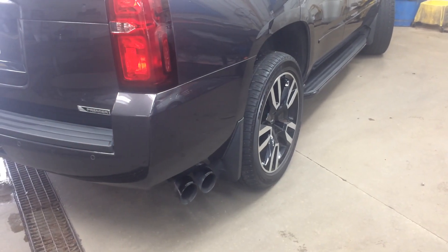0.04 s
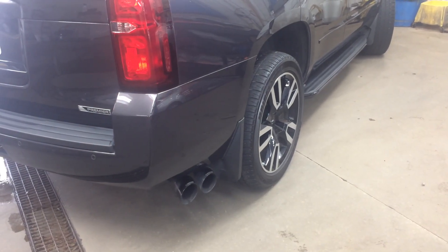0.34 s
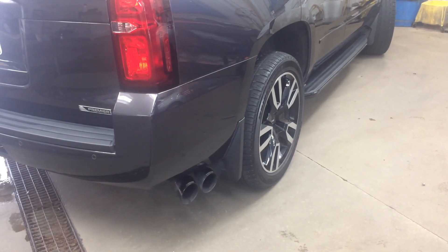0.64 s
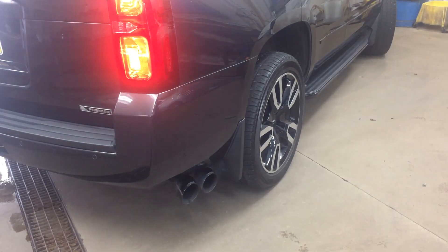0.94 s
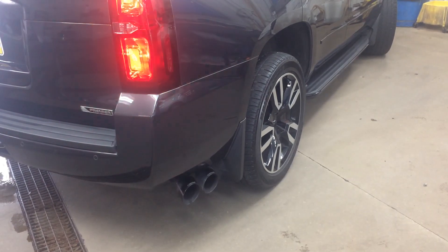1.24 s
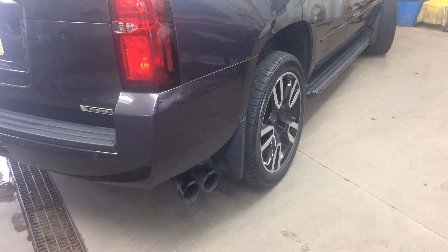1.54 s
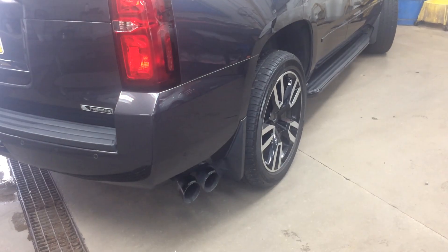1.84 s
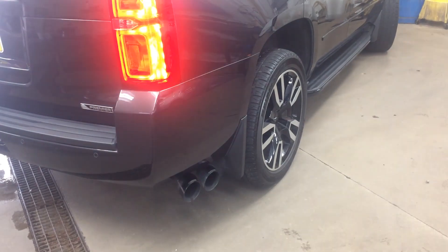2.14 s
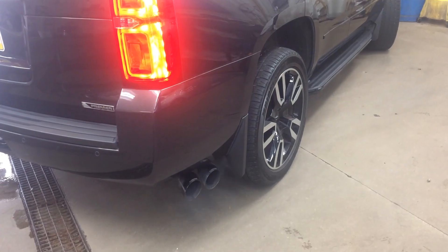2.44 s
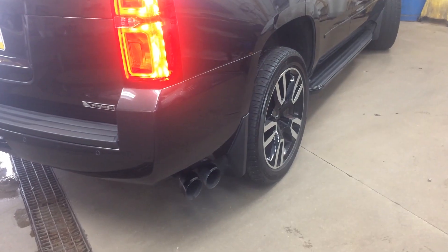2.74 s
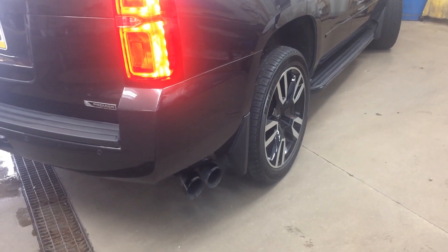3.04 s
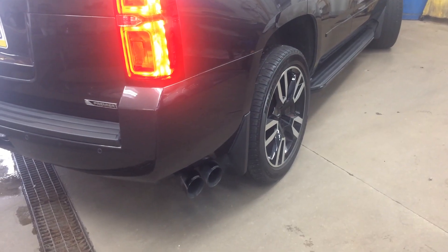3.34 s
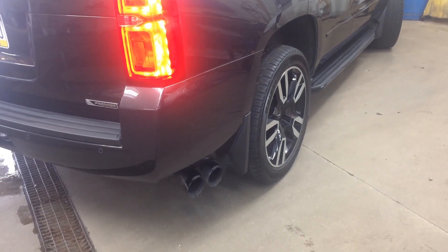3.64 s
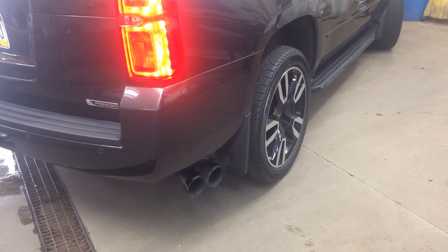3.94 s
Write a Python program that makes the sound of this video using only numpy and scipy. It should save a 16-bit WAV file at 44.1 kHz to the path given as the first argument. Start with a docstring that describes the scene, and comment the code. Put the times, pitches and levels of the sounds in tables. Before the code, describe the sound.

A big V8 engine starts in a garage, heard close to the tailpipes. A low room hum throbs at first, joined by a faint, thin fuel pump whine at 0.8 seconds. At about 1.2 seconds the starter knocks in and grinds. The engine catches at 2 seconds with hard bangs, then runs in a loud, fast, burbling idle that sinks slightly until 4 seconds.

```python
"""A big V8 starts from cold in a garage, heard from beside its tailpipes. A room hum throbs, and the fuel
pump sets in with a thin whine. The starter pinion knocks in and its gears grind through a few
compressions, ringing their housing. The engine catches with hard bangs and the starter dies away.
Unevenly spaced exhaust pulses then excite the pipes in a fast, burbling idle that slowly sinks."""
import sys
import numpy as np
from scipy import signal
from scipy.fft import rfft, irfft, next_fast_len
from scipy.io import wavfile
from scipy.ndimage import map_coordinates

SR = 44100
rng = np.random.default_rng(int(sys.argv[2]) if len(sys.argv) > 2 else 0)


def to_wav(s):
    """Save 16-bit WAV."""
    ch = np.atleast_2d(s).T  # columns
    pcm = np.round(np.clip(ch, -1, 1) * 32767)  # PCM
    wavfile.write(sys.argv[1], SR, pcm.astype(np.int16))


N = 176400
CATCH_S = 1.98

# engine speed: time_s, firing_rate_hz
FIRING_RATE = [(1.98, 99.71), (2.1, 100.41), (2.2, 96.84), (2.35, 99.48), (2.5, 98.73), (2.65, 98.3),
               (2.8, 96.34), (3.0, 95.49), (3.2, 95.3), (3.4, 95.07), (3.6, 93.51), (3.8, 92.06),
               (4.0, 89.5)]
# cylinders in firing order: delay_in_firing_gaps, thump_db, bark_db, rasp_db, ring_db, tick_db
FIRING_ORDER = [(.48, -1, -2, -2, -7, -26), (.3, 2, 1, 6, 2.5, -1.5), (.38, -8, -9, 2, -1, -29),
                (.2, 4, -14, -14, -10, -7), (.35, 0, 6.5, 1, 7, 6), (.44, 1, 5, 4, 2.5, -23),
                (.28, 0, 1, -2, 2.5, -1.5), (.42, 3, 1, 1, 5.5, 4.5)]
# envelopes of the deep rumble and of the pipe boom: time_s, level_db
RUMBLE_ENVELOPE = [(1.98, -21), (2.02, -27), (2.11, -28), (2.2, -25), (2.8, -26), (3.12, -33), (3.4, -30),
                   (4, -42)]
BOOM_ENVELOPE = [(1.98, -64), (2.01, -22), (2.05, -13.5), (2.2, -18.5), (2.45, -18), (2.75, -17.5),
                 (2.9, -19), (3.45, -18.5), (3.8, -17), (4, -14.5)]
# envelopes of the upper exhaust bands: time_s, bark_db, rasp_db, hiss_db
UPPER_ENVELOPES = [(1.98, -19, -31, -25), (2.02, -14, -14, -26.5), (2.08, -22.5, -20.5, -32.5),
                   (2.25, -18, -22.5, -35.5), (2.6, -21.5, -25.5, -41.5), (2.9, -21.5, -26, -42.5),
                   (3.5, -22, -27, -40.5), (4, -23.5, -28.5, -41.5)]


def amp(db):
    """Decibels to amplitude ratio."""
    return 10 ** (np.asarray(db) / 20)


def unit(x):
    """Normalisation to rms 1."""
    return x / np.sqrt(np.mean(x ** 2) + 1e-20)


def clock():
    """Sample times in seconds."""
    return np.arange(N) / SR


def along(points, hz):
    """Interpolation on a logarithmic frequency axis."""
    f, v = np.transpose(points)
    return np.interp(np.log(hz + 1), np.log(f + 1), v)


def curves(rows):
    """Linear interpolation in time: one curve for each column after the first."""
    times, *columns = np.transpose(rows)
    return [np.interp(clock(), times, column) for column in columns]


def wobble(rate):
    """Smooth random modulation: a spline through `rate` knots a second."""
    return map_coordinates(rng.standard_normal(int(N * rate / SR) + 4), [clock() * rate])


def coloured(x, spectrum):
    """Minimum-phase filtering by the folded cepstrum, at rms 1."""
    m = 2 * next_fast_len(N)
    cepstrum = irfft(np.log(amp(along(spectrum, np.fft.rfftfreq(m, 1 / SR)))))
    cepstrum[1:m // 2] *= 2
    cepstrum[m // 2 + 1:] = 0
    return unit(irfft(rfft(x, m) * np.exp(rfft(cepstrum)))[:N])


def noise(spectrum):
    """Spectrally shaped noise of rms 1."""
    return coloured(rng.standard_normal(N), spectrum)


def resonance(hz, width):
    """A resonance driven by noise gives a fuzzy tone."""
    f = np.fft.rfftfreq(N, 1 / SR)
    return unit(irfft(rfft(rng.standard_normal(N)) / (1 + (2 * (f - hz) / width) ** 2), N))


def levelled(puff, spectrum):
    """Energy normalisation: puffs come out equally strong after the given filter."""
    response = amp(along(spectrum, np.fft.rfftfreq(len(puff), 1 / SR)))
    return puff / np.linalg.norm(rfft(puff) * response)


def bursts(events, spectrum, decay_s, edge):
    """Impulsive excitation: a pressure edge and decaying noise for each (start_s, level_db)."""
    t, out = np.arange(SR // 10) / SR, np.zeros(N)
    for start_s, db in events:
        puff = np.exp(-t / decay_s) * rng.standard_normal(len(t))
        puff[0] -= edge * np.linalg.norm(puff)
        out[int(start_s * SR):][:len(t)] += amp(db) * levelled(puff, spectrum)
    energy = sum(amp(db) ** 2 for _, db in events) * decay_s / 2
    return coloured(out, spectrum) * np.sqrt(energy * SR / N)


def room_tone(floor_db=-44.5, rustle_db=-46, fade_s=0.29):
    """Low room modes drone over broadband noise, while a rustle of air decays exponentially."""
    # ambient noise and rustle: frequency_hz, density_db
    floor_spectrum = [(15, -48), (25, -46), (48, -10.5), (63, -28), (87, -24), (144, -12), (202, -27),
                      (244, -36.5), (436, -30.5), (525, -32.5), (741, -30), (1360, -32.5), (2500, -35),
                      (3400, -39), (4900, -42.5), (5900, -49), (14000, -68)]
    rustle_spectrum = [(60, -3), (150, 8.5), (230, 2), (310, 11), (420, 5.5), (700, 6), (2500, -0.5),
                       (5000, -7), (9000, -14), (15000, -31)]
    # room modes: frequency_hz, width_hz, level_db
    modes = [(202.2, 25, -45.5), (287, 150, -55.5)]
    # their envelope: time_s, gain_db
    mode_envelope = [(0, 6), (.16, 2.5), (.24, 6.5), (.31, 1), (1.2, -0.5)]
    drone = sum(amp(db) * resonance(hz, width) for hz, width, db in modes)
    rustle = noise(rustle_spectrum) * amp(rustle_db) * np.exp(-clock() / fade_s)
    return amp(floor_db) * noise(floor_spectrum) + drone * amp(curves(mode_envelope)[0]) + rustle


def room_hum(pitch_hz=83.3, throb_s=0.027, floor_db=-43.5):
    """Amplitude modulation by Gaussian swells makes a low tone throb."""
    # swells of the hum: centre_s, level_db
    throbs = [(.02, -32), (.118, -31.5), (.206, -31), (.286, -33), (.385, -35), (.527, -29), (.62, -29),
              (.71, -31.5), (.8, -30.5), (.912, -33), (1.005, -31), (1.09, -26), (1.17, -30), (1.3, -31),
              (1.41, -35), (1.51, -34.5), (1.76, -47), (1.92, -36)]
    t = clock()
    envelope = amp(floor_db) + sum(amp(db) * np.exp(-((t - s) / throb_s) ** 2) for s, db in throbs)
    return envelope * unit(np.sin(2 * np.pi * pitch_hz * t + .5 * wobble(14.2)))


def fuel_pump(start_s=.78, rise_s=0.052):
    """Narrow bands of noise are heard as the thin whine of the pump."""
    # pump whine: frequency_hz, width_hz, level_db
    bands = [(4700, 700, -64), (7300, 600, -77), (12000, 1500, -82)]
    whine = sum(amp(db) * resonance(hz, width) for hz, width, db in bands)
    return whine * np.clip((clock() - start_s) / rise_s, 0, 1)


def garage(x, wet_db):
    """Reverberation between concrete walls: convolution with a tail whose treble dies first."""
    # reverberation time: frequency_hz, t60_s
    decay_times = [(100, 0.95), (1000, 0.75), (4000, 0.65), (12000, 0.13)]
    hz, t, bands = signal.stft(rng.standard_normal(SR // 2), SR, nperseg=256)
    tail = signal.istft(bands * amp(-60 * t / along(decay_times, hz)[:, None]), SR, nperseg=256)[1]
    response = np.r_[np.zeros(SR // 200), tail / np.linalg.norm(tail)]  # arrives 5 ms late
    wet = signal.fftconvolve(x, response)[:N]
    return (x + amp(wet_db) * wet) / np.hypot(1, amp(wet_db))


def pinion_knocks():
    """Brief impacts of the starter pinion radiate broadband clacks."""
    # impacts: start_s, level_db
    knocks = [(1.246, -16.5), (1.266, -15.5), (1.277, -12.5), (1.303, -19.5), (1.673, -21), (1.698, -21),
              (1.806, -31), (1.824, -24), (1.915, -19.5), (1.947, -21.5)]
    # one clack: frequency_hz, density_db
    knock_spectrum = [(70, -32), (130, -9), (270, -3), (600, -14.5), (1000, -8), (1450, 2), (2400, -6.5),
                      (4000, -11), (6000, -11.5), (10000, -15), (15500, -35)]
    return bursts(knocks, knock_spectrum, decay_s=0.008, edge=0.1)


def starter(compression_s=1.62, release_s=2.09, release_db_per_s=108):
    """Meshing gears, loaded by each compression, force their housing to ring; they fade after the catch."""
    # cranking envelopes: time_s, gear_db, tooth_db
    cranking = [(1.225, -66, -67), (1.247, -29.5, -22.5), (1.28, -25, -26), (1.34, -33.5, -31.5),
                (1.46, -27.5, -30), (1.52, -25, -30), (1.58, -28.5, -32), (1.664, -33, -31.5),
                (1.675, -28.5, -28.5), (1.73, -24.5, -30), (1.797, -35, -35.5), (1.81, -21.5, -26),
                (1.855, -25, -30.5), (1.905, -33, -34.5), (1.92, -31, -28), (1.95, -24.5, -29.5),
                (2, -37, -31.5)]
    # gear note: time_s, pitch_hz
    gear_pitch = [(1.25, 800), (1.35, 1020), (1.5, 1180), (1.63, 1300), (1.72, 1130), (1.78, 1330),
                  (1.84, 1200), (1.9, 1350), (2, 1400)]
    # gear grind and tooth rasp: frequency_hz, density_db
    gear_spectrum = [(71, -51), (120, -4.5), (140, -14), (178, -37), (199, -16), (285, -9.5), (422, -14.5),
                     (479, -6), (565, -9.5), (626, -6.5), (777, -8.5), (1270, -1.5), (2500, -12),
                     (3250, -42), (5500, -120)]
    tooth_spectrum = [(1470, -22), (2500, -12), (2820, 3.5), (3220, -8), (3690, 1.5), (4010, -5.5),
                      (4750, -2.5), (5360, -1), (6950, -4), (9950, -8.5), (15500, -26)]
    # housing modes: frequency_hz, width_hz, early_db, compressed_db
    modes = [(2290, 35, -11, -23), (2880, 50, -15, -20), (3330, 82, -14, -30), (3747, 210, -26, -10.5),
             (4920, 60, -20, -12.5)]
    # brief squeals: centre_s, half_length_s, pitch_hz, width_hz, level_db
    squeals = [(1.485, .025, 6870, 120, -38), (1.6, .045, 4720, 400, -32.5), (1.515, .04, 545, 45, -35),
               (1.45, .04, 1060, 60, -35), (1.703, .01, 1290, 110, -23), (1.829, .012, 1370, 120, -25)]
    t = clock()
    gear_db, tooth_db = curves(cranking)
    engaged = (t > cranking[0][0]) * amp(-release_db_per_s * np.maximum(t - release_s, 0))
    flutter = unit(amp(0.92 * wobble(300)))
    gear_phase = 2 * np.pi * np.cumsum(curves(gear_pitch)[0]) / SR
    gear_note = unit(np.sin(gear_phase + 1.75 * wobble(220)))
    ring = sum(amp(np.where(t < compression_s, early, compressed)) * resonance(hz, width)
               for hz, width, early, compressed in modes)
    gears = unit(noise(gear_spectrum) + amp(-5) * gear_note) * amp(gear_db - 1)
    teeth = unit(noise(tooth_spectrum) + ring) * amp(tooth_db - 1)
    squeal = sum(amp(db) * resonance(hz, width) * np.exp(-((t - s) / half) ** 2)
                 for s, half, hz, width, db in squeals)
    return engaged * flutter * (gears + teeth) + squeal


def firing_count():
    """Phase is the integral of frequency: firings counted from the catch."""
    count = np.cumsum(curves(FIRING_RATE)[0]) / SR
    return count - np.interp(CATCH_S, clock(), count)


def puffs(spectrum, delays, sizes_db, decay_s, rough, edge, scatter_db, jitter_s):
    """A pulse train: each firing is a pressure edge, its cylinder's own ripple and fresh turbulence."""
    count, out = firing_count(), np.zeros(N + SR)
    t = np.arange(SR // 20) / SR
    fade = np.exp(-t / decay_s)
    fade /= np.linalg.norm(fade)
    ripple = rng.standard_normal((len(sizes_db), len(t)))
    for firing in range(int(count[0]) + 1, int(count[-1]) + 1):
        cylinder = firing % len(sizes_db)
        start_s = np.interp(firing + delays[cylinder], count, clock()) + jitter_s * rng.normal()
        turbulence = rng.standard_normal(len(t))
        puff = fade * (np.sqrt(1 - rough) * ripple[cylinder] + np.sqrt(rough) * turbulence)
        puff[0] -= edge
        gain = amp(sizes_db[cylinder] + scatter_db * rng.normal())
        out[max(0, int(start_s * SR)):][:len(t)] += gain * levelled(puff, spectrum)
    return coloured(out[:N], spectrum)


def valve_ticks(delay_gaps=.65):
    """Periodic impacts: the valves of a few cylinders tick clearly once a cycle."""
    # one tick: frequency_hz, density_db
    tick_spectrum = [(2500, -45), (3900, -17), (4250, -5), (4500, 0), (4750, -6), (5200, -19), (7500, -21),
                     (15000, -35)]
    sizes_db = np.transpose(FIRING_ORDER)[-1]
    ticks = puffs(tick_spectrum, np.full(len(sizes_db), delay_gaps), sizes_db,
                  decay_s=.0014, rough=.9, edge=.3, scatter_db=2, jitter_s=.0001)
    return ticks * amp(curves(UPPER_ENVELOPES)[2] - 6)  # follows the hiss envelope


def hard_firings():
    """Pressure transients of the rich first charges bang in the pipes and crack at their tips."""
    # uneven first firings: start_s, bang_db, crack_db
    charges = [(1.990, -11, -13), (2.013, -4, -7), (2.033, -9, -9), (2.046, -8, -2), (2.066, -8, -8),
               (2.082, -2, -9), (2.115, -9, -3), (2.134, -8, -2), (2.147, -12, -8), (2.164, -5, -8),
               (2.183, -5, -6), (2.216, -10, -7), (2.235, -6, -1), (2.298, -8, -10), (2.346, -7, -15),
               (2.469, -10, -15), (2.507, -11, -10), (2.621, -9, -15)]
    # bang and crack: frequency_hz, density_db
    bang_spectrum = [(20, -39), (100, -0.5), (220, 8), (330, -5.5), (450, -7.5), (690, -2.5), (950, -2),
                     (1200, -20.5), (3000, -53)]
    crack_spectrum = [(20, -63), (900, -26), (1200, -2), (1550, 12.5), (1950, -3.5), (2280, 4.5),
                      (2750, -24), (4400, -15), (8000, -37), (15000, -48)]
    bangs = bursts([(s, db) for s, db, _ in charges], bang_spectrum, decay_s=0.0033, edge=0.82)
    cracks = bursts([(s, db) for s, _, db in charges], crack_spectrum, decay_s=0.002, edge=0.66)
    return bangs + amp(-1) * cracks


def exhaust_pulses():
    """Source and filter: each firing excites five bands of the tailpipes, over a noisy rumble."""
    # exhaust bands: frequency_hz, density_db
    thump_band = [(8, -45), (25, -17), (50, -6), (90, -21), (130, -5), (165, 3), (235, -4.5), (295, 9),
                  (318, -23.5), (340, -14), (368, 5.5), (400, -9), (470, -14), (700, -4), (1500, -60)]
    bark_band = [(250, -55), (360, -21), (420, -4.5), (480, -9), (535, 5.5), (590, -7.5), (650, 6),
                 (710, 4.5), (780, -5.5), (900, -3), (1000, -3.5), (1130, -19.5), (1500, -55.5)]
    rasp_band = [(800, -31.5), (1150, -14.5), (1330, 3), (1440, 1), (1680, -4.5), (1900, -18), (2650, -25),
                 (2950, -16.5), (3500, -27.5), (6000, -47)]
    tip_band = [(1500, -36.5), (1950, -12.5), (2150, 2), (2300, 1.5), (2450, -8.5), (2650, -31),
                (3500, -40.5)]
    hiss_band = [(1760, -10.5), (3000, -6.5), (3190, -9), (4060, -11), (4440, -11.5), (6170, -13.5),
                 (9450, -19), (12400, -23.5), (15500, -44)]
    rumble_band = [(15, -38), (30, -11), (42, -20), (52, 0), (64, 4), (90, 3.5), (125, 10), (170, -43.5)]
    delays, thumps, barks, rasps, rings, _ = np.transpose(FIRING_ORDER)
    bark_db, rasp_db, hiss_db = curves(UPPER_ENVELOPES)
    # combustion is ragged at first and thumps harder: time_s, gain_db
    ragged_db, = curves([(2, 0), (2.25, -2), (2.65, -3), (3, -6), (3.5, -6), (4, -5)])
    thump = puffs(thump_band, delays, thumps,
                  decay_s=.0078, rough=.54, edge=1.1, scatter_db=1.5, jitter_s=.00023)
    bark = puffs(bark_band, delays, barks,
                 decay_s=.0074, rough=.74, edge=.85, scatter_db=.5, jitter_s=.0001)
    rasp = puffs(rasp_band, delays, rasps,
                 decay_s=.0073, rough=.16, edge=.87, scatter_db=3.8, jitter_s=.00008)
    tips = puffs(tip_band, delays, rings,
                 decay_s=.0035, rough=.82, edge=.51, scatter_db=4, jitter_s=.00033)
    hiss = puffs(hiss_band, delays, rings / 4,
                 decay_s=.029, rough=.99, edge=.066, scatter_db=1.8, jitter_s=.00037)
    return (thump * amp(curves(BOOM_ENVELOPE)[0] + ragged_db) + bark * amp(bark_db)
            + rasp * amp(rasp_db - 1) + tips * amp(rasp_db - 10) + hiss * amp(hiss_db + 1)
            + noise(rumble_band) * amp(curves(RUMBLE_ENVELOPE)[0] - 3))


def exhaust_notes(boom_top_hz=440.2, lope_db=5, lope_peak_gaps=5.8, waver_db=2.5, drift_rad=0.15):
    """Harmonics of the engine cycle: the firing note, with the uneven banks' burble below and above it."""
    # harmonics of the eight-firing cycle: order, level_db
    orders = [(2, -33), (4, -18), (5, -17), (6, -20), (7, -26), (8, 0), (9, -13), (10, -12), (11, -28),
              (12, -25), (13, -10.5), (14, -19), (15, -9.5), (16, -10), (17, -21), (18, -18.5), (19, -15),
              (20, -17.5), (21, -15), (22, -35), (24, -7.5), (25, -14.5), (26, -12), (27, -19.5), (28, -34),
              (29, -17), (30, -29.5), (31, -11), (32, -24), (33, -21), (35, -14), (45, -9), (46, -20),
              (50, -10.5), (53, -19), (54, -18), (55, -14.5), (56, -19), (58, -7.5)]
    # pipe standing waves, which lift each order that slides through them: frequency_hz, gain_db
    standing_waves = [(140, -20.5), (160, -1), (171, 4), (182, 4), (200, -3.5), (234, 6.5), (248, -17),
                      (260, 8.5), (275, -11), (297, 5), (322, -6.5), (345, -5.5), (368, 3.5), (400, -8.5)]
    # envelopes of the firing note and of the orders that swell as the idle sinks: time_s, level_db
    note_envelope = [(1.98, -28), (2.02, -21), (2.08, -36), (2.14, -14), (2.6, -15.5), (3, -20.5),
                     (3.45, -20.5), (3.75, -24.5), (4, -32)]
    swell_envelope = [(3.2, -36), (3.55, -26), (3.8, -21), (4, -21)]
    cylinders = len(FIRING_ORDER)
    angle = 2 * np.pi * firing_count() / cylinders
    cycle_hz = curves(FIRING_RATE)[0] / cylinders
    top_order = boom_top_hz / np.mean(cycle_hz)

    def harmonic(order, db):
        gain = amp(db + along(standing_waves, order * cycle_hz) + waver_db * wobble(6.8))
        return gain * np.sin(order * angle + 2 * np.pi * rng.random() + drift_rad * wobble(9))

    def between(low, high):
        return unit(sum(harmonic(order, db) for order, db in orders if low < order < high))

    lope = unit(amp(lope_db * np.cos(angle - 2 * np.pi * lope_peak_gaps / cylinders)))  # once a cycle
    note = unit(-np.sin(cylinders * angle)) * amp(curves(note_envelope)[0] + 0.82 * wobble(14))
    swell = between(15, 21) * amp(curves(swell_envelope)[0])
    rumble = between(0, cylinders) * amp(curves(RUMBLE_ENVELOPE)[0] - 2)
    boom = between(cylinders, top_order) * amp(curves(BOOM_ENVELOPE)[0] - 2.5)
    burble = between(top_order, np.inf) * lope * amp(curves(UPPER_ENVELOPES)[0] - 8)
    return note + swell + rumble + boom + burble


def scene():
    """Superposition of engine, starter and background; only the pulses and knocks reverberate."""
    running = np.clip((clock() - CATCH_S) / 0.012, 0, 1)  # opens as the engine catches
    firings = running * (exhaust_pulses() + valve_ticks()) + hard_firings()
    engine = garage(firings, wet_db=-8.5) + running * exhaust_notes()
    pinion = garage(pinion_knocks(), wet_db=0.5)
    return (engine + starter() + pinion + room_tone() + room_hum() + fuel_pump())[None]


def record(dry, ceiling=1.04, top_hz=15750):
    """Soft saturation rounds the loudest peaks; a sharp low-pass limits the band."""
    rounded = dry / (1 + abs(dry / ceiling) ** 6) ** (1 / 6)
    m = next_fast_len(N + SR // 2)
    passband = np.fft.rfftfreq(m, 1 / SR) < top_hz
    return irfft(rfft(rounded, m) * passband, m)[..., :N]


dry = scene()
out = record(dry)
to_wav(out)
```